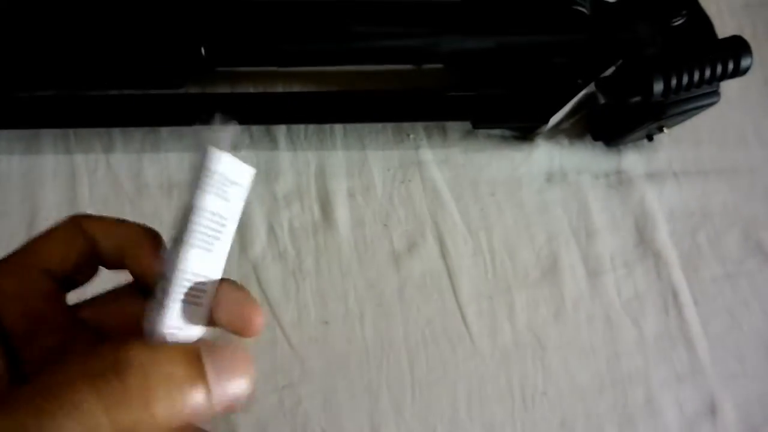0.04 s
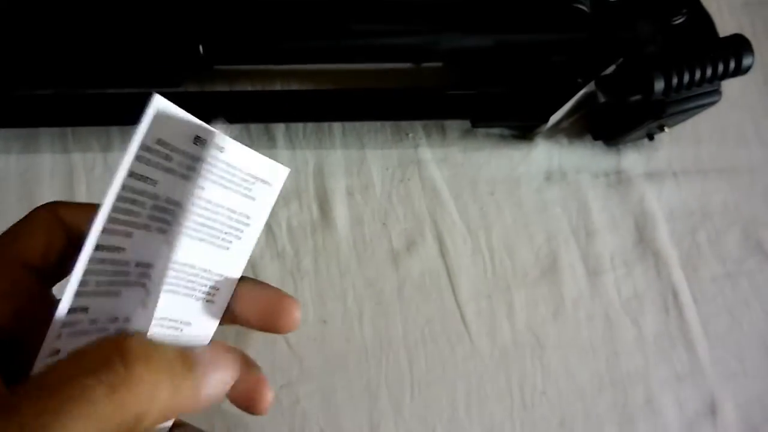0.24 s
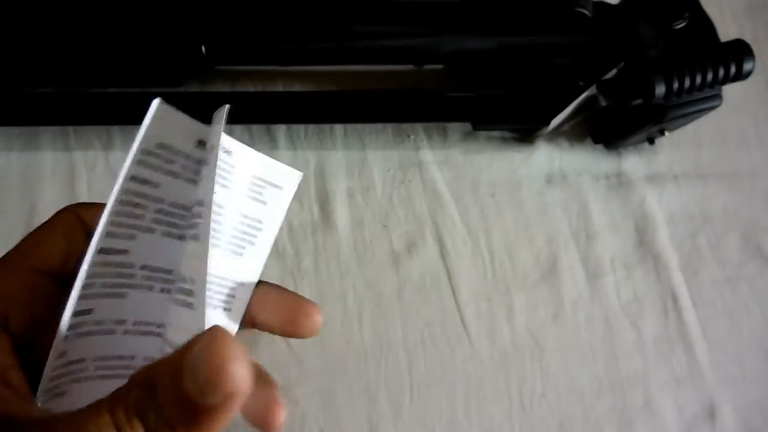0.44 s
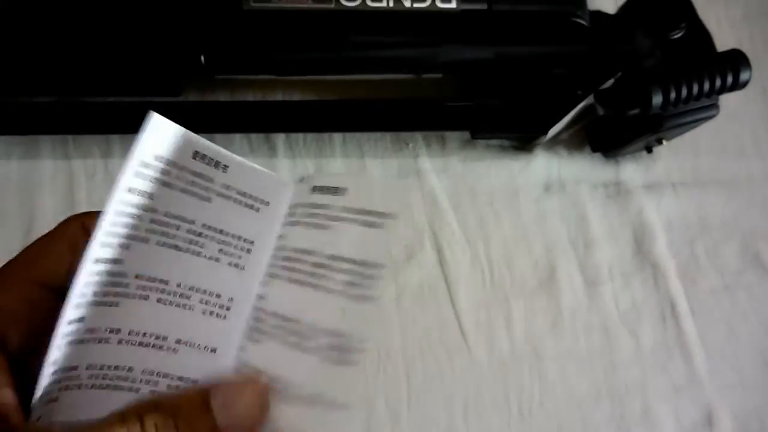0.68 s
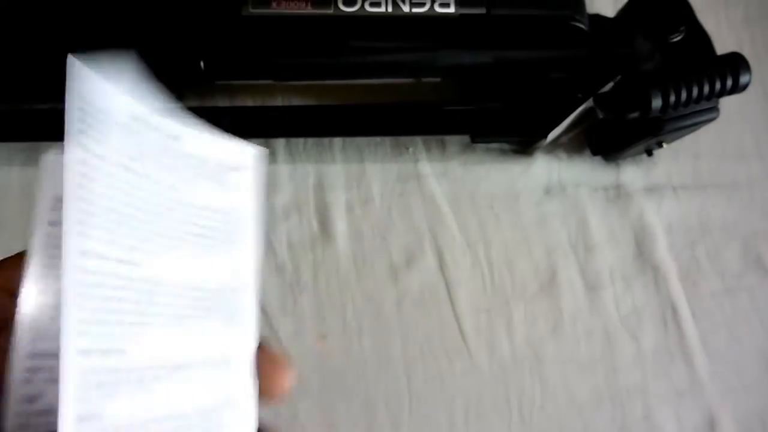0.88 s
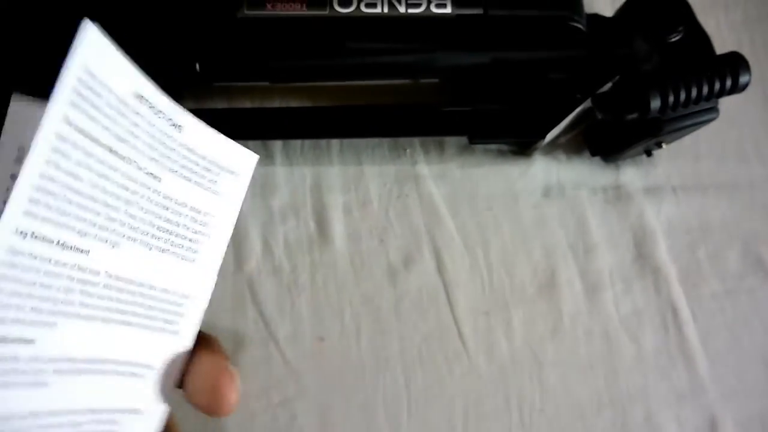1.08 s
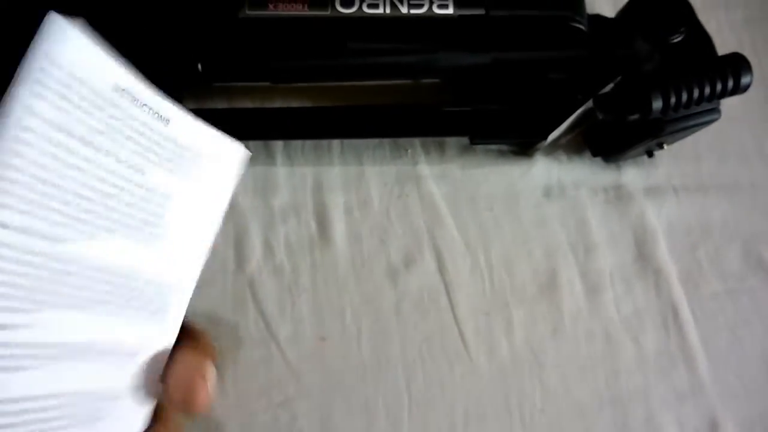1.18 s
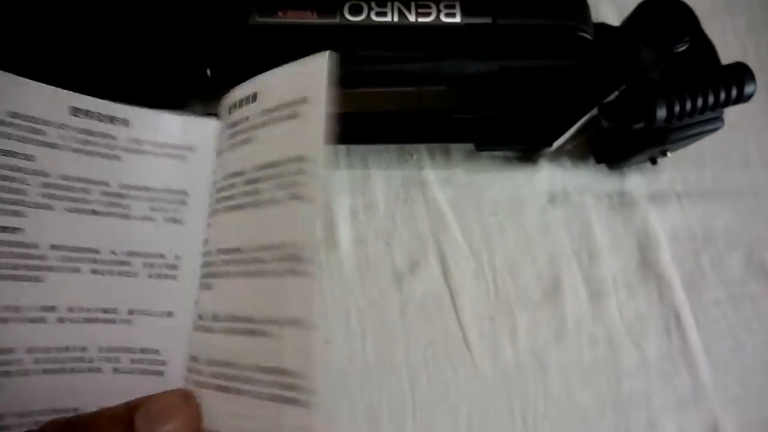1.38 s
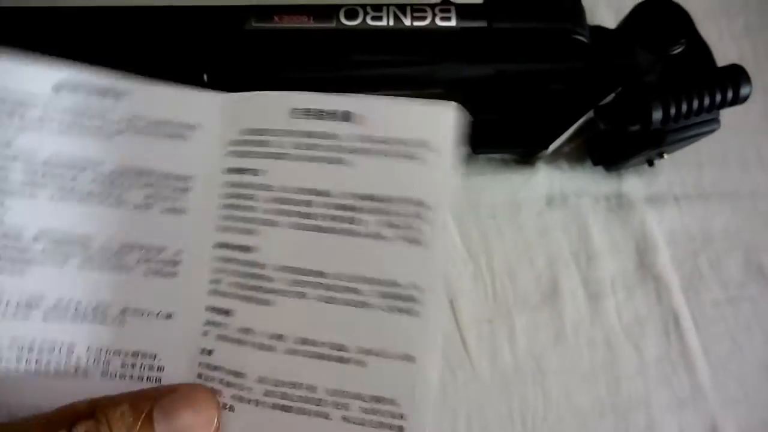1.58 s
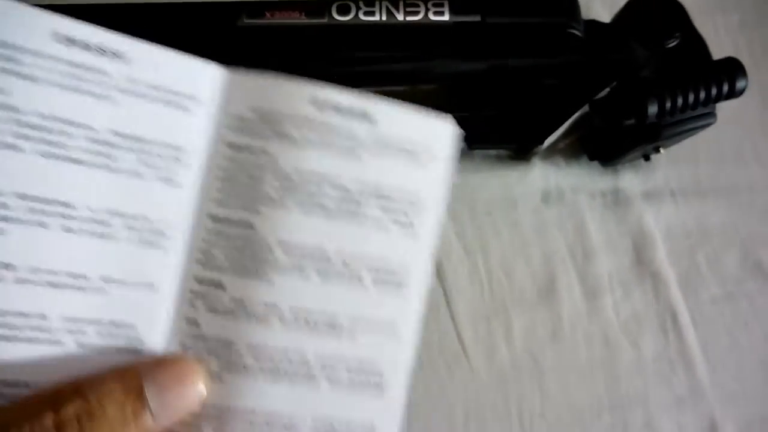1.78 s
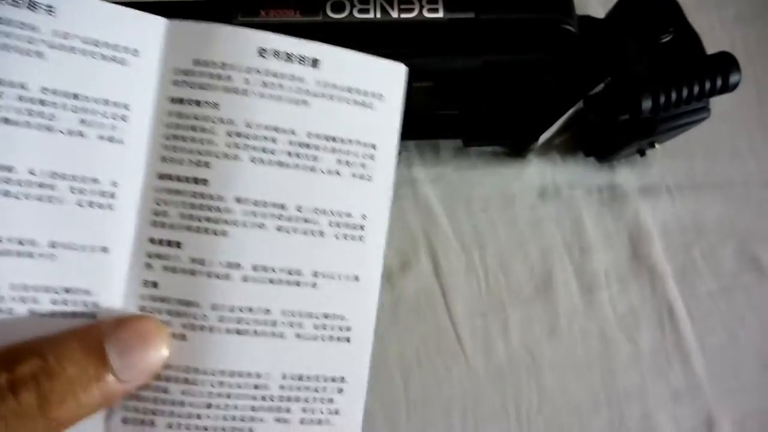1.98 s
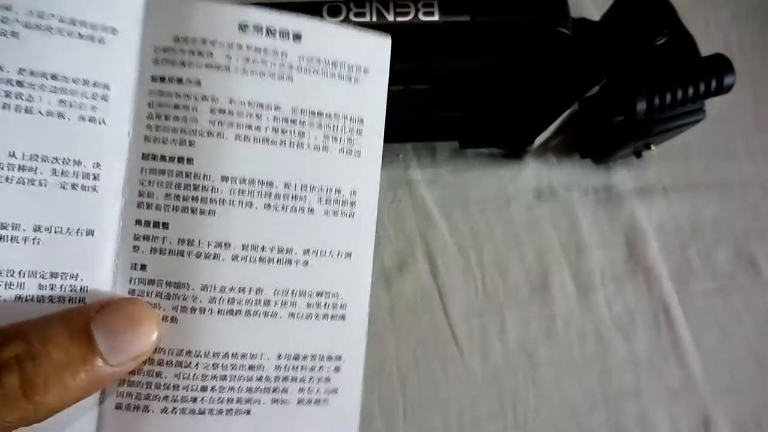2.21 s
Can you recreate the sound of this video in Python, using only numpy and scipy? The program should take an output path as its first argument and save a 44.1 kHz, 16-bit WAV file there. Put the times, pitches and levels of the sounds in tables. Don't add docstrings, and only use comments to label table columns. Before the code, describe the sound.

Paper leaflet unfolded close by, irregular crisp rustles, crackles and sharp crease pops in a quiet room

```python
import sys
import numpy as np
from scipy import signal
from scipy.fft import rfft, irfft, next_fast_len
from scipy.io import wavfile
from scipy.ndimage import uniform_filter1d, map_coordinates

SR = 44100
rng = np.random.default_rng(int(sys.argv[2]) if len(sys.argv) > 2 else 0)


def log_audio(samples):
    frames = np.atleast_2d(samples).T
    limited = np.clip(frames, -1, 1)
    pcm = np.round(limited * 32767).astype(np.int16)
    wavfile.write(sys.argv[1], SR, pcm)


def boost(x):
    u = np.asarray(x, float) / 20
    return 10 ** u


N = 99225

# pitch_hz, level_db (per Hz)
CRACK_TONE = [(120, -30.5), (500, -11), (1800, -3.5), (3400, -5), (6000, -10), (10000, -16.5), (13000, -24),
              (15700, -42)]


def unit(x):
    return x / np.sqrt(np.mean(x ** 2) + 1e-18)


def colour(x, points):
    p = np.array(points, float)
    n = next_fast_len(len(x) + 1024)
    hz = np.arange(n // 2 + 1) * SR / n
    log_gain = np.log(boost(np.interp(np.log(hz + 1), np.log(p[:, 0]), p[:, 1])))
    ceps = irfft(log_gain, n)
    ceps[1:n // 2] *= 2
    ceps[n // 2 + 1:] = 0
    return unit(irfft(rfft(x, n) * np.exp(rfft(ceps)), n)[:len(x)])


def ring(x, hz, width_hz):
    return signal.lfilter(*signal.iirpeak(np.clip(hz, 20, .45 * SR), hz / width_hz, SR), x)


def high(x, hz):
    return signal.sosfilt(signal.butter(2, hz, "high", fs=SR, output="sos"), x)


def low(x, hz):
    return signal.sosfilt(signal.butter(2, hz, fs=SR, output="sos"), x)


def walk(rate):
    k = int(SR / rate)
    stairs = np.repeat(rng.standard_normal(N // k + 1), k)
    return 1.22 * uniform_filter1d(uniform_filter1d(stairs, k), k)[:N]


def slips(rate, spread_db, largest=4):
    happens = rng.random(N) < rate / SR
    size = boost(spread_db * np.minimum(rng.exponential(size=N), largest))
    return happens * size * np.sign(rng.standard_normal(N))


def add(out, s, x):
    i = int(s * SR)
    out[i:i + len(x)] += x[:N - i]


def rub():
    # start_s, end_s, level_db, brightness_db (per octave)
    strokes = [(0, 0.086, -57, 1), (0.136, 0.142, -47.5, 2.5), (0.186, 0.257, -61.5, 3),
               (0.24, 0.292, -51.5, -1.5), (0.339, 0.415, -55, 0.8), (0.456, 0.554, -60, 0.5),
               (0.537, 0.58, -47.5, -0.5), (0.601, 0.667, -48, -1), (0.677, 0.73, -54.5, 0.5),
               (0.768, 0.842, -46, 1), (0.841, 0.969, -44, 0.5), (0.992, 1.091, -48.5, 0),
               (1.103, 1.198, -46, 0.5), (1.209, 1.28, -56, 0.5), (1.292, 1.314, -32.5, -1),
               (1.32, 1.38, -52, -1.5), (1.425, 1.546, -48.5, 0.5), (1.564, 1.607, -41.5, -1),
               (1.616, 1.711, -51, 0.5), (1.663, 1.706, -57.5, 8), (1.203, 1.275, -65.5, 6),
               (1.734, 1.778, -56, -4), (1.786, 1.899, -52, 0), (1.92, 1.94, -69, -20),
               (1.941, 1.953, -42, 1.5), (1.947, 2.02, -71, -3)]
    # pitch_hz, level_db (per Hz)
    sheet_tone = [(120, -43.5), (500, -7.5), (1100, -9), (3400, -7), (4800, -14.5), (9000, -20),
                  (13000, -22.5), (15700, -48)]
    rise_s, fall_s = 0.011, 0.0056
    body_hz, body_width_hz, body_db = 1700, 224, -9.5
    patch_db, grain_db = 0.5, 3
    t, strength, tilt = np.arange(N) / SR, np.full(N, 1e-9), np.zeros(N)
    for start, end, db, bright in strokes:
        edge = np.minimum((t - start) / rise_s - 1, (end - t) / fall_s)
        stroke = boost(db) * np.exp(np.minimum(0, edge))
        strength = strength + stroke
        tilt = tilt + stroke * bright
    flicker_db = -2 + 1.8 * walk(44.76)
    clicks = np.array([slips(9000, 2.6) for _ in range(2)])
    sheet = rfft([colour(c, sheet_tone) + boost(body_db) * unit(ring(c, body_hz, body_width_hz))
                  for c in clicks])
    half_octave = 2 * np.log2(np.arange(N // 2 + 1) * SR / N / 2000 + 1e-9)
    out = 0
    for k in range(-9, 8):
        band = irfft(sheet * np.clip(1 - abs(half_octave - k), 0, 1), N)
        change_db = patch_db * walk(25.46) + grain_db * walk(140)
        out = out + band * boost(flicker_db + change_db + tilt / strength * k / 2)
    out[0] += singing_panels(clicks[0], flicker_db) + creaks()
    return out * strength


def singing_panels(clicks, flicker_db):
    # start_s, end_s, pitch_hz, level_db (over the rubbing)
    panels = [
        (0, 0.085, 5060, 2.5),
        (0.257, 0.324, 660, -1.5),
        (0.627, .74, 1730, -4),
        (1.112, 1.217, 1620, -10),
        (1.41, 1.56, 2890, -8),
        (1.79, 1.88, 3020, -22),
    ]
    out, t = np.zeros(N), np.arange(N) / SR
    for start, end, hz, db in panels:
        on = uniform_filter1d(1. * (t > start) * (t < end), size=400)
        out += on * boost(flicker_db + db) * unit(ring(clicks, hz, hz / 12.4))
    return out


def creaks():
    creak_pitches = [1500, 2100, 2700, 3430, 4300]
    out = np.zeros(N)
    for hz in creak_pitches:
        width_hz = hz / 6.7
        creak = slips(70, 4)
        out += boost(-17) * unit(ring(ring(creak, hz, width_hz), hz, width_hz))
    return out


def ticks():
    # time_s, peak_db, pitch_hz, brightness_db
    creases = [(0.049, -33, 4600, -12), (0.0785, -42, 2700, -2), (0.1248, -40, 900, -3),
               (0.167, -44, 1550, -6), (0.397, -33, 2760, 0), (0.476, -36.5, 3380, -36),
               (0.651, -28, 1870, -1), (0.697, -38, 1800, -8), (0.888, -27, 1720, -10),
               (1.0215, -31.5, 2560, -10), (1.371, -42, 1670, -12), (.2488, -19.5, 2310, -5),
               (.6165, -36, 9000, 4), (.3498, -37, 10000, 0), (1.2738, -36, 11500, -6),
               (.6508, -38, 10000, -3), (1.911, -37, 2200, -12), (.5485, -36, 1600, -8),
               (.9165, -29, 3020, -3), (1.274, -36, 1700, 1), (1.486, -30.5, 1700, -20),
               (1.636, -27, 2100, -10), (2.236, -42, 1940, -21)]
    # time_s, peak_db, pitch_hz, brightness_db
    more_creases = [(.254, -12, 3300, -6), (.329, -38, 3500, -20), (.3497, -34, 900, 3), (.909, -26, 1500, -16),
                    (1.8402, -30, 1500, 2), (1.6975, -29, 1300, -5), (1.7485, -37, 2150, -20),
                    (1.7557, -35, 1500, -16), (1.762, -33, 1300, -12), (1.769, -31, 1200, -10),
                    (1.7806, -30, 1200, -14), (1.8545, -37, 1100, -20), (1.9355, -25, 1500, -10)]
    cycles, snap_s = 1.4, .0006
    tail_db, tail_s = -14, .003
    overtone, overtone_db = 2.2, -1
    out, t = np.zeros(N), np.arange(1500) / SR
    noise = colour(rng.standard_normal(N), CRACK_TONE)
    sharp = unit(high(noise, 2100))
    for s, db, hz, bright_db in list(creases) + list(more_creases):
        i = int(s * SR * .95)
        over_hz = overtone * hz
        body = np.sin(2 * np.pi * hz * t) * np.exp(-t * hz / cycles)
        body = body + boost(overtone_db) * np.sin(2 * np.pi * over_hz * t) * np.exp(-t * over_hz / 2)
        snap = boost(bright_db) * sharp[i:i + len(t)] * np.exp(-t / snap_s)
        tail = boost(tail_db) * noise[i:i + len(t)] * np.exp(-t / tail_s)
        add(out, s + .001, boost(db - 3) * (body + snap + tail))
    return out


def bursts():
    # peak_time_s, level_db, fall_s, pitch_hz, treble_db
    buckles = [(0.146, -46, 0.0026, 2110, 10), (.243, -34.5, 0.0017, 4500, 19),
               (0.2529, -28.5, 0.0025, 2440, 0), (0.256, -29.5, 0.006, 636, 12),
               (0.558, -34, 0.0049, 1510, 12.5), (.622, -40.5, .004, 1700, -8),
               (0.641, -38, 0.0026, 1740, 16.5), (0.717, -47.5, 0.031, 1650, 15.5),
               (.918, -34, 0.0039, 1920, 2), (0.927, -35, 0.0019, 1880, 14), (.925, -34, 0.0023, 630, 0),
               (1.121, -41, 0.0048, 1620, -15), (1.309, -34.5, 0.0062, 4300, -8),
               (1.309, -26.5, 0.0041, 1850, -18), (1.422, -37.5, 0.0054, 2630, -27),
               (1.559, -40.5, 0.0031, 2080, -11), (1.584, -35, 0.0049, 1920, 8),
               (1.589, -28.5, 0.0023, 2880, 4), (1.595, -28.5, 0.0052, 1700, -17),
               (1.682, -46, 0.011, 1830, -7), (1.944, -40, 0.007, 900, -18),
               (1.947, -40, 0.0017, 2410, -11)]
    treble_hz, ring_q, ring_db = 4500, 3.5, 5
    out, t = np.zeros(N), np.arange(N) / SR
    clicks = slips(3000, 1.1)
    broad = colour(clicks, CRACK_TONE)
    treble = high(high(broad, treble_hz), treble_hz)
    dull = low(low(broad, treble_hz), treble_hz)
    for s, db, fall, hz, treble_db in buckles:
        shape = np.exp(-abs(t - s) / fall)
        panel = boost(ring_db) * unit(ring(clicks, hz, hz / ring_q))
        part = shape * (dull + boost(treble_db) * treble + panel)
        out += boost(db) * part * np.sqrt(np.sum(shape ** 2) / np.sum(part ** 2))
    return out


def pops():
    # peak_time_s, peak_db, pitch_hz, length_cycles
    panel_pops = [(.126, -36, 2830, 3.1), (.3515, -30.5, 3490, 3.95), (.3515, -37, 1870, 2.67),
                  (.351, -37, 5200, 4.1), (.3515, -33.5, 532, 1.07), (.398, -37, 3620, 2.6),
                  (.3985, -41, 1200, 1.5), (.4025, -42, 3340, 5.7), (.612, -41, 1600, 2.6),
                  (.6188, -24.5, 1560, 1.72), (.6188, -27.5, 2150, 2.9), (.6195, -29.5, 760, 1.7),
                  (.644, -38, 1700, 4), (.653, -35.5, 1850, 4.2), (.654, -38.5, 800, 1.46),
                  (.85, -35, 1650, 3.1), (1.0105, -34, 1990, 1.46), (1.023, -30, 2480, 3),
                  (1.0228, -30, 3260, 2.6), (1.0788, -29, 1970, 2.7), (1.079, -39, 3900, 4),
                  (1.2705, -41, 2570, 2.3), (1.2757, -20, 1700, 1.74), (1.2935, -33, 1700, 2.5),
                  (1.3035, -19, 944, 1.68), (1.3062, -18.5, 1770, 2.5), (1.306, -26, 4300, 3.6),
                  (1.3095, -19, 2300, 3.4), (1.3085, -37, 6500, 4), (1.4133, -25, 2630, 1.7),
                  (1.415, -26.5, 1890, 2.06), (1.4158, -29, 3530, 2.2), (1.4197, -20, 2860, 2.1),
                  (1.4228, -32, 3000, 2.8), (1.4285, -35, 2700, 3.3), (1.437, -35, 3300, 3.8),
                  (1.5225, -33.5, 3000, 2.8), (1.588, -20.5, 3320, 3.3), (1.589, -25, 2100, 3.04),
                  (1.5875, -21, 5000, 4), (1.594, -19, 1650, 2.75), (1.6985, -31, 2090, 1.6),
                  (0.925, -29.5, 2600, 5), (.925, -30, 3830, 6), (.926, -29.5, 1860, 3.97),
                  (.944, -35.5, 1310, 1.6), (0.9483, -35.5, 1650, 2.2), (1.5898, -22, 4500, 3.5),
                  (1.591, -28, 5750, 5.2), (1.3025, -26.5, 558, 1.42)]
    # time_s, peak_db
    ratchet = [
        (1.159, -32),
        (1.1678, -34),
        (1.181, -31),
        (1.188, -34),
        (1.196, -32),
    ]
    out, t = np.zeros(N), np.arange(1500) / SR
    edge_pops = [(s, db, 1650, 2.48) for s, db in ratchet]
    for s, db, hz, cycles in list(panel_pops) + edge_pops:
        rise = cycles / hz / 2
        swell = t / rise * np.exp(1 - t / rise)
        add(out, s - rise, boost(db) * np.sin(2 * np.pi * hz * t) * swell)
    return out


def flaps():
    # time_s, level_db, pitch_hz, fade_s
    puffs = [(0.256, -31, 231, 0.0047), (0.349, -44.5, 249, 0.0097), (0.559, -60.5, 62, 0.029),
             (0.619, -47, 330, 0.0067), (0.929, -58, 89, 0.018), (1.077, -43, 195, 0.0053),
             (1.15, -60, 91, 0.02), (0.351, -68, 60, 0.02), (1.187, -56.5, 104.5, 0.018),
             (1.302, -55, 130, 0.0099), (0.251, -60, 69, 0.013), (1.59, -68, 50, 0.05),
             (1.83, -66, 45, 0.036)]
    out, t = np.zeros(N), np.arange(8000) / SR
    for s, db, hz, fade in puffs:
        shape = np.exp(-t / fade) * (1 - np.exp(-t * hz * 4))
        add(out, s, boost(db) * np.sin(2 * np.pi * hz * t) * shape)
    return out


def echo(x, t60, hz, kind):
    t = np.arange(int(.3 * SR)) / SR
    noise = rng.standard_normal((2, len(t))) * boost(-60 * t / t60)
    noise = signal.sosfilt(signal.butter(1, hz, kind, fs=SR, output="sos"), noise)
    noise = noise / np.sqrt(np.sum(noise ** 2, axis=1, keepdims=True))
    return signal.fftconvolve(x[None], noise, axes=1)[:, :N]


def hiss():
    # pitch_hz, level_db (per Hz)
    hiss_tone = [(15, -45), (25, -21), (119, -12), (469, -11), (509, -6), (1110, -9), (1240, -4.5),
                 (1380, -6.5), (15500, -32)]
    own = np.array([colour(rng.standard_normal(N), hiss_tone) for _ in range(2)])
    bass = low(own, 200)
    return boost(-60.5 + 2 + walk(4.4) / 2) * (own - bass + 0.64 * bass + 0.12 * bass[::-1])


def later(x):
    lag_samples = 1.537
    return map_coordinates(x, [np.arange(N) - lag_samples], mode="nearest")


def scene():
    balance_db, fine_hz = 0.9, 8500
    slide, apart = rub()
    paper = slide + high(ticks(), 353) + bursts() + pops() + flaps()
    side = boost(-3.5) * high(apart, 2700)
    side = side + boost(-11) * echo(paper, 0.01, 1500, "high")[0]
    side = side + boost(-7.5) * echo(high(paper, fine_hz), 0.0029, fine_hz, "high")[0]
    near = (paper + side) * boost(balance_db / 2)
    far = later(paper - side) * boost(-balance_db / 2)
    room = boost(-19) * echo(paper, 0.34, 4850, "low")
    return np.array([near, far]) + room + hiss()


def band_limit(x):
    return signal.sosfilt(signal.butter(12, 15830, fs=SR, output="sos"), x)


def record(dry):
    cut = signal.sosfilt(signal.ellip(8, .2, 70, 15400, fs=SR, output="sos"), dry)
    return band_limit(cut)


dry = scene()
out = record(dry)
log_audio(out)
```